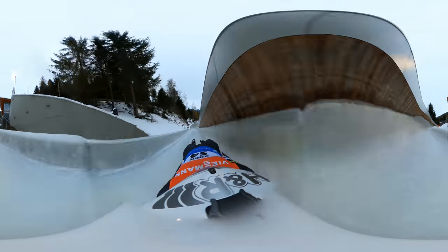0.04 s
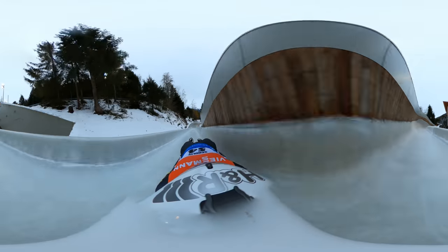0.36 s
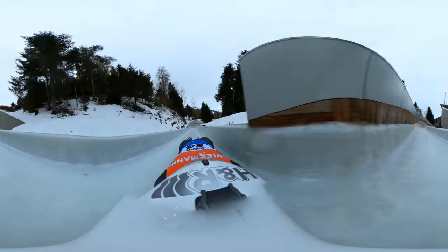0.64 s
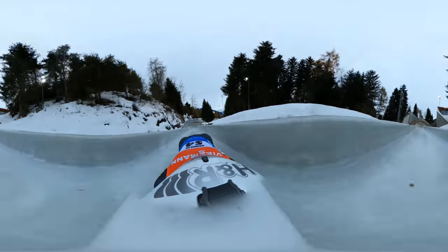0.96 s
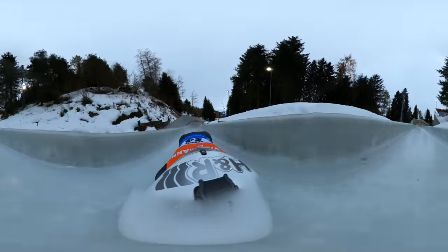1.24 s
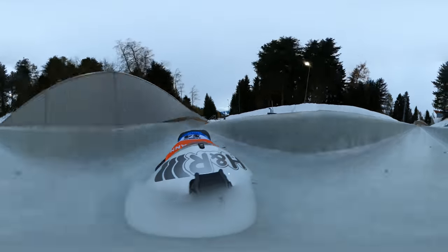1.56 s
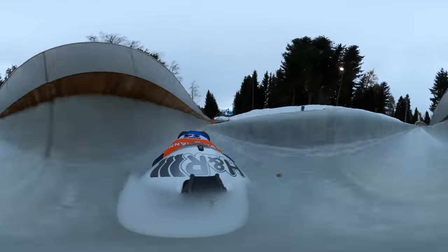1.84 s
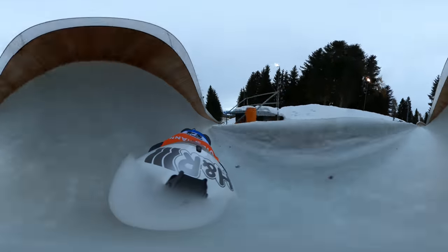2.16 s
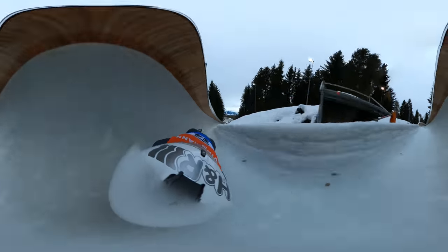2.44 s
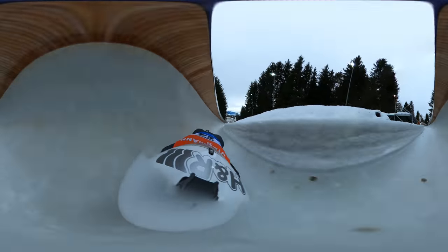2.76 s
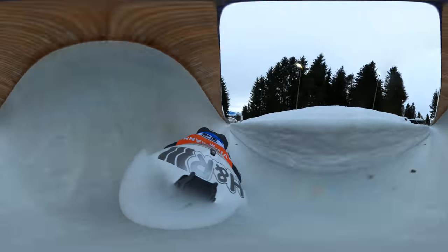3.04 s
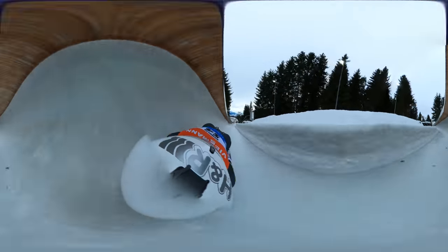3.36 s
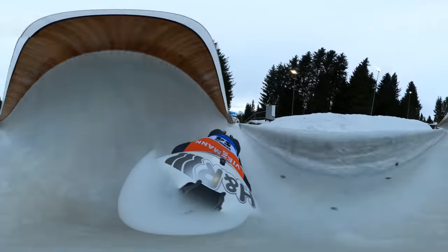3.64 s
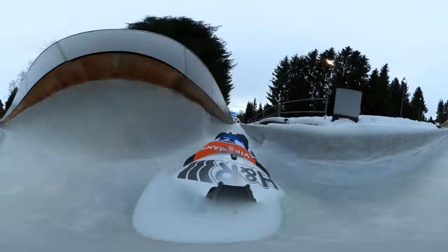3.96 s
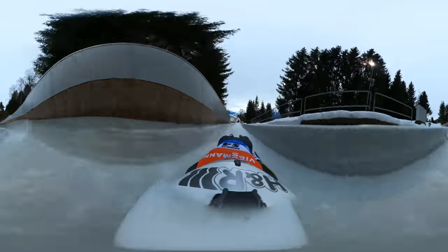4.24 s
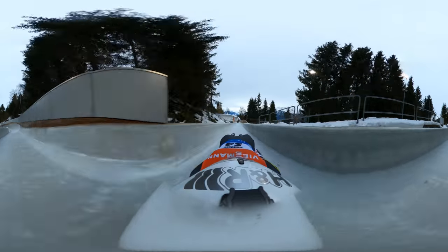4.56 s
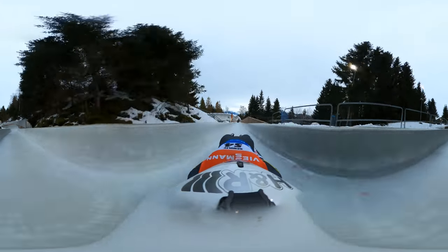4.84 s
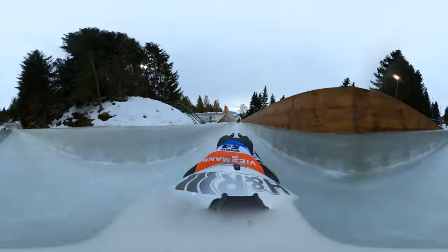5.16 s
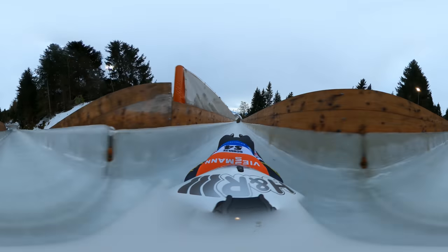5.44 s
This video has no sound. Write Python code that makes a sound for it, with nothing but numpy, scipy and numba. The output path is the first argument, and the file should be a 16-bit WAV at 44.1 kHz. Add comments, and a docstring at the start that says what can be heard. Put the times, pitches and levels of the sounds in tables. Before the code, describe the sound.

A sled speeds over bumpy ice with deep wind rush, hollow rumbling, rapid clattering knocks and hissing, chirping runners.

```python
"""Wind buffets the microphone over the rumble and hiss of a luge running down an ice track.
The camera rides on the sled, so bumps in the ice knock and rattle both the shell and the mount.
The steel runners throw up ice dust and flakes, climb in pitch under load and zip wherever an edge
bites. Now and then a splinter ticks against the camera, or the sled bottoms out with a heavy thud."""
import sys
import numpy as np
from scipy import signal
from scipy.fft import rfft, irfft
from scipy.io import wavfile
from scipy.ndimage import uniform_filter1d
from numba import njit

SR = 44100
rng = np.random.default_rng(int(sys.argv[2]) if len(sys.argv) > 2 else 0)


def transcribe(signal):
    """Save signal, clipped to [-1, 1], as a 16-bit WAV file at the path in sys.argv[1]."""
    frames = np.atleast_2d(signal).T
    limited = np.clip(frames, -1, 1)
    pcm = np.round(limited * 32767).astype(np.int16)
    wavfile.write(sys.argv[1], SR, pcm)


N = 246519
T = np.arange(N) / SR
TOP_HZ = 11500


def undb(db):
    """Decibels to gain."""
    return 10 ** (np.asarray(db) / 20)


def unit(x):
    """Scale to rms 1."""
    return x / np.sqrt(np.mean(x ** 2))


def fader(table, column=1):
    """Level automation: straight ramps between the timed points of one column."""
    points = np.transpose(table)
    return np.interp(T, points[0], points[column])


def walk(rate):
    """Smooth random drift with rms 1, heading for a new value `rate` times a second."""
    hold = int(SR / rate)
    steps = rng.standard_normal(N)[np.arange(N) // hold]
    return unit(uniform_filter1d(uniform_filter1d(steps, hold), hold))


def colour(x, spectrum, size=8192):
    """Minimum-phase EQ through (frequency [Hz], gain [dB]) points: nothing rings ahead of a hit."""
    hz, db = np.transpose(spectrum)
    bins = np.maximum(np.fft.rfftfreq(size, 1 / SR), 1)
    cepstrum = irfft(np.log(undb(np.interp(np.log(bins), np.log(hz), db))))
    cepstrum[1:size // 2] *= 2
    cepstrum[size // 2 + 1:] = 0
    return signal.fftconvolve(x, irfft(np.exp(rfft(cepstrum))))[:len(x)]


def ring(force, modes, detune):
    """Damped modes driven by a force; every contact point weights them differently."""
    t = np.arange(len(force)) / SR
    response = np.zeros(len(force))
    for hz, t60, db in modes:
        decay = undb(db + 2 * rng.standard_normal() - 60 * t / t60)
        response += decay * np.sin(2 * np.pi * hz * detune * t)
    return signal.fftconvolve(force, response)[:len(force)]


def grains(rate, spread_db, count=N):
    """Tiny contacts at random moments, a few much larger than the rest."""
    size = undb(spread_db * np.minimum(rng.exponential(size=count), 4))
    return unit((rng.random(count) < rate / SR) * size * rng.choice([-1, 1], count))


def slips(rate, half_s, spread_db):
    """Short surges at random moments, as steel catches and lets go; rms 1."""
    size = undb(spread_db * np.clip(rng.standard_normal(N), -2, 2))
    catches = (rng.random(N) < rate / SR) * size
    surge = signal.windows.gaussian(1025, half_s * SR)
    return unit(np.abs(signal.fftconvolve(catches, surge, "same")))


@njit
def resonate(x, hz, damping):
    """Swept state-variable filter; gives (band-pass, high-pass)."""
    band, high = np.empty(len(x)), np.empty(len(x))
    band_state, low_state = 0., 0.
    for i in range(len(x)):
        g = np.tan(np.pi * hz[i] / SR)
        v = (band_state + g * (x[i] - low_state)) / (1 + g * (g + damping))
        low = low_state + g * v
        band[i], high[i] = damping * v, x[i] - damping * v - low
        band_state, low_state = 2 * v - band_state, 2 * low - low_state
    return band, high


# fader moves of the airstream: (time [s], level [dB])
WIND_LEVELS = [(0.0, -17), (0.12, -24.5), (0.33, -17.5), (0.83, -25.5), (0.95, -20), (1.59, -18),
               (2.43, -23), (2.71, -18), (2.8, -23), (2.95, -22), (3.05, -21), (3.13, -31), (3.16, -24.5),
               (3.45, -21), (4.33, -19.5), (4.41, -22), (4.5, -18.5), (4.88, -22), (5.05, -18.5),
               (5.23, -17.5), (5.33, -16), (5.59, -18.5)]
# sub-heavy tone of the buffeting: (frequency [Hz], gain [dB])
WIND_EQ = [(12, -7), (28, 3), (45, 1), (70, -1), (100, -2.5), (130, -4.5), (180, -13.5), (260, -36),
           (500, -32.5), (1200, -88.5)]
def wind(gust_db=1.37, gusts_per_s=14, trim_db=1.5):
    """Eddies on the microphone port: a deep, tumbling pressure that comes in gusts."""
    eddies = unit(colour(rng.standard_normal(N), WIND_EQ))
    # the airstream is steady, so its strength over several eddies varies little
    strength = np.sqrt(uniform_filter1d(eddies ** 2, size=5000))
    return eddies / strength * undb(fader(WIND_LEVELS) + trim_db + gust_db * walk(gusts_per_s))


# fader moves of the sled on the ice: (time [s], shell rumble [dB], runner hiss [dB], ice spray [dB])
RIDE_LEVELS = [(0.0, -27.5, -44, -56.5), (0.721, -33.5, -47.5, -62.5), (1.231, -29, -47.5, -59),
               (1.52, -32.5, -48, -59.5), (2.02, -29.5, -49, -62.5), (2.44, -31, -47.5, -63),
               (2.74, -29, -54, -62), (3.111, -30, -48.5, -61), (3.3, -27.5, -46.5, -60),
               (3.61, -27, -47.5, -57), (4.47, -31, -45.5, -57), (5.151, -32, -39, -56.5),
               (5.59, -29.5, -44.5, -58)]
# hollow body of the rumble: (frequency [Hz], gain [dB])
RUMBLE_EQ = [(110, -20), (180, -1), (230, 4), (320, -1), (430, -9), (520, -14.5), (640, -13), (850, -24.5),
             (1050, -24.5), (1350, -33.5), (2200, -52), (4000, -82.5)]
def rumble(trim_db=-0.5):
    """The fine roughness of the ice drums on the sled."""
    roughness = grains(rate=600, spread_db=3.3) * undb(3 * walk(55))
    return unit(colour(roughness, RUMBLE_EQ)) * undb(fader(RIDE_LEVELS) + trim_db)


# what reaches the camera from the runners: (frequency [Hz], gain [dB])
SCRAPE_EQ = [(2800, 5), (4000, 0.5), (4900, -10), (5700, -3.5), (7200, -16.5), (8500, -25.5),
             (12000, -47.5)]
def scrape(force, pitch, damping=0.16):
    """Grit rings the steel-on-ice contact: little gets through below resonance, the top falls slowly."""
    _, resonant = resonate(force, pitch, damping)
    _, low_cut = resonate(resonant, 0.88 * pitch, 0.7)
    hiss, _ = resonate(low_cut, 1.5 * pitch, 0.59)
    return unit(colour(hiss, SCRAPE_EQ)) * np.std(force)


# modes of the steel, before detuning: (frequency [Hz], t60 [s], level [dB])
STEEL_MODES = [(5175, 0.046, -1), (5820, 0.05, 0), (6400, 0.03, 7)]
# midrange rasp of the sled's frame: (frequency [Hz], gain [dB])
FRAME_EQ = [(400, -18.5), (750, 0), (1050, -2), (1350, -8), (2000, -12), (5000, -46.5)]
def runners(hiss_db, trim_db=-2.5, frame_db=-5.5, grind_db=-12, steel_db=-19, sing_share=0.34):
    """Steel grinds on ice: the edges scrape, sing and zip, the blades ring faintly, the frame rasps."""
    contact_hz, bite_power, chatter = edge_bites()
    glide = undb(hiss_db + trim_db)
    grit = grains(rate=4000, spread_db=2.3) * unit(1 + 0.6 * slips(130, half_s=0.001, spread_db=3.5))
    force = grit * np.sqrt(glide ** 2 + (1 - sing_share) * bite_power * (1 + chatter ** 2) / 2)
    pitch = np.clip(contact_hz * np.exp(0.04 * walk(40) + 0.05 * walk(170)), 500, 8000)
    edge = scrape(force, pitch) + sing(pitch, sing_share * bite_power) + zips()
    steel = unit(ring(edge, STEEL_MODES, detune=0.99)) * np.std(edge) * undb(steel_db)
    # a lightly loaded runner skitters and makes the frame rasp; a pressed one holds it still
    skitter = glide * undb(frame_db) * np.sqrt(CONTACT_HZ / contact_hz)
    # a biting edge grinds through to the frame as well
    rasp = unit(colour(grit, FRAME_EQ)) * np.sqrt(skitter ** 2 + undb(grind_db) ** 2 * bite_power)
    return edge + steel + rasp


# puffs of ice dust: (time [s], level [dB], power fade [s])
DUST_PUFFS = [(1.7, -42.5, 0.0078), (3.585, -52.5, 0.036), (3.92, -52.5, 0.018), (4.155, -49, 0.034),
              (5.19, -52.5, 0.054)]
# airy tone of the dust: (frequency [Hz], gain [dB])
SPRAY_EQ = [(1500, -1.5), (3000, -2.5), (4000, -0.5), (5000, -1), (5600, -3), (7000, -5), (7900, -11.5),
            (8600, -19.5), (10000, -26), (12000, -46.5)]
def spray(spray_db, rise_s=0.0072):
    """Ice dust thrown up by the runners: a fine hiss that swells in puffs."""
    dust = grains(rate=9000, spread_db=2.5) * undb(walk(50))
    power = undb(spray_db) ** 2
    for s, db, fade_s in DUST_PUFFS:
        power += undb(db) ** 2 * np.exp(-np.abs(T - s) / np.where(T < s, rise_s, fade_s))
    return unit(colour(dust, SPRAY_EQ)) * np.sqrt(power)


# crisp tone of the ice flakes: (frequency [Hz], gain [dB])
FLAKE_EQ = [(800, -6), (2500, 4.5), (5000, 1.5), (7500, -0.5), (9000, -18), (12000, -29.5)]
def flakes(spray_db, trim_db=-7.5, bursts_per_s=16):
    """Flakes of ice break off and patter on the sled in short, bright bursts."""
    patter = grains(rate=3000, spread_db=2.5) * slips(bursts_per_s, half_s=0.0049, spread_db=-2.5)
    return unit(colour(patter, FLAKE_EQ)) * undb(spray_db + trim_db)


MOUNT_HZ = 236.5  # joint pitch of the mount's modes; a blow can shift it
# modes of the camera mount: (frequency [Hz], t60 [s], level [dB])
MOUNT_MODES = [(236, 0.072, 6), (268, 0.05, -4), (374, 0.064, -6.5)]
# modes of the shell, three for the clack, then the clatter: (frequency [Hz], t60 [s], level [dB])
SHELL_MODES = [(520, 0.031, 10.5), (595, 0.025, 3.5), (717, 0.017, 8.5), (927, 0.019, -3),
               (995, 0.029, 0.5), (1251, 0.01, 9.5), (1684, 0.033, -1), (1927, 0.055, -2)]
# what the padded mount lets through: (frequency [Hz], gain [dB])
PAD_EQ = [(90, -6.5), (190, 0.5), (700, 0.5), (1500, -9.5), (2500, -10.5), (4000, -2.5), (8000, -43.5)]
def knock(thump_db, clack_db, clatter_db, crack_db, rattle_s, mount_hz, body_db=-0.27, top_db=3.5):
    """One bump: a blow inside a short rattle rings mount and shell, with a crack of steel on ice."""
    t = np.arange(8192) / SR - 0.02
    envelope = np.exp(-np.abs(t) / np.where(t < 0, 0.4 * rattle_s, rattle_s))
    rattle = grains(rate=2500, spread_db=3.5, count=len(t)) * envelope
    blow = signal.unit_impulse(len(t), np.argmax(t >= 0))
    detune = np.exp(0.045 * rng.standard_normal())
    thump = colour(ring(blow + 0.083 * rattle, MOUNT_MODES, mount_hz / MOUNT_HZ), PAD_EQ)
    clack = colour(ring(blow + 0.16 * rattle, SHELL_MODES[:3], detune), PAD_EQ)
    clatter = colour(ring(blow + 0.16 * rattle, SHELL_MODES[3:], detune), PAD_EQ)
    layers = [(thump, thump_db + body_db), (clack, clack_db + body_db),
              (clatter, clatter_db + top_db), (crack(blow, rattle), crack_db + top_db)]
    # each level is an rms, as if the layer's energy fell within 17 ms
    return sum(x * undb(db) / np.sqrt(np.sum(x ** 2) / (0.017 * SR)) for x, db in layers)


# hard, bright tone of steel hitting ice: (frequency [Hz], gain [dB])
CRACK_EQ = [(600, -46), (1500, 12.5), (2500, 12.5), (3600, 11), (5000, -1.5), (7000, -11), (8200, -23.5),
            (9500, -29), (13000, -47)]
def crack(blow, rattle):
    """The runner strikes the ice: the dry attack on top of a knock."""
    return colour(blow + 0.13 * rattle, CRACK_EQ)


# mix of a small bump against the rumble fader: (thump [dB], clack [dB], clatter [dB], crack [dB])
JOLT_MIX = [1.5, -11.5, -19, -23.5]
def jolts(per_s=7, spread_db=1, rattle_s=0.0079, count=80):
    """Cues for small bumps at uneven intervals, stronger where the ice is rough; rows as in BIG_BUMPS."""
    chance = rng.standard_normal((count, 5))
    times = (np.arange(count) + 0.5 + 0.3 * chance[:, 0]) / per_s
    rumble_db = np.interp(times, T, fader(RIDE_LEVELS))
    levels = rumble_db[:, None] + JOLT_MIX + spread_db * chance[:, 1:]
    return [(s, *mix, rattle_s, MOUNT_HZ) for s, mix in zip(times, levels) if s < T[-1]]


# the big bumps in the ice: (time [s], mount thump [dB], shell clack [dB], shell clatter [dB],
# steel crack [dB], rattle decay [s], mount pitch [Hz])
BIG_BUMPS = [(0.09, -14.5, -30, -42, -46, 0.0099, 223), (0.109, -10, -26, -33.5, -42, 0.0055, 234),
             (0.161, -19.5, -51, -55, -53, 0.0041, 234), (0.234, -20.5, -32, -46, -53, 0.0036, 260),
             (0.354, -15.5, -39.5, -42, -60, 0.0018, 224), (0.37, -25, -51, -46, -63, 0.032, 208),
             (0.437, -18, -49, -40.5, -48.5, 0.01, 244), (0.447, -21.5, -51, -52, -62, 0.002, 252),
             (0.518, -22, -48, -44, -53, 0.01, 211), (0.59, -25, -41, -44, -50, 0.0044, 205),
             (0.701, -21, -49, -44.5, -48, 0.018, 218), (0.847, -24.5, -41.5, -41, -47.5, 0.021, 213),
             (1.026, -13, -26.5, -39, -41, 0.0092, 235), (1.536, -17.5, -29, -37.5, -48, 0.026, 242),
             (1.565, -22, -22.5, -36.5, -45, 0.0099, 225), (1.669, -20.5, -22.5, -31.5, -40, 0.0076, 247),
             (1.708, -19.5, -28, -30.5, -43, 0.012, 210), (1.798, -20.5, -28, -36, -70, 0.016, 237),
             (1.812, -46, -39, -34.5, -57, 0.023, 275), (1.837, -39, -28, -40.0, -42.5, 0.011, 230),
             (1.875, -23, -32.5, -37, -51, 0.002, 240), (1.888, -23.5, -27, -37.5, -52, 0.0017, 253),
             (1.986, -21.5, -39, -44.5, -46, 0.0051, 200), (2.04, -22, -41, -52, -62, 0.0017, 191),
             (2.096, -19.5, -32.5, -40.5, -51, 0.013, 231), (2.117, -28, -42.5, -42, -52, 0.0054, 243),
             (2.203, -26, -30.5, -49, -55, 0.0055, 244), (2.245, -20.5, -28.5, -49, -53, 0.0022, 309),
             (2.48, -20.5, -44, -54, -63, 0.011, 222), (2.505, -31, -33.5, -60, -70, 0.013, 252),
             (2.579, -32, -34, -49, -55, 0.0054, 196), (2.677, -25, -30.5, -43, -51, 0.014, 193),
             (2.698, -20.5, -41, -55, -56, 0.0059, 194), (2.819, -24, -32.5, -40, -47, 0.023, 260),
             (2.838, -20.5, -29.5, -49, -54, 0.014, 249), (2.915, -21.5, -38, -50, -60, 0.024, 234),
             (2.965, -29.5, -37, -55, -63, 0.0073, 250), (3.01, -27, -37, -48, -55, 0.0041, 254),
             (3.056, -18.5, -28, -43, -56, 0.0087, 214), (3.11, -30, -44, -50, -64, 0.0046, 246),
             (3.156, -22, -34, -36, -51, 0.0025, 235), (3.194, -24.5, -34, -37, -55, 0.0033, 261),
             (3.24, -20, -31, -57, -62, 0.0086, 198), (3.276, -26.5, -28.5, -49, -57, 0.0044, 260),
             (3.357, -19.5, -42, -35.5, -53, 0.0019, 266), (3.416, -22.5, -44, -44, -54, 0.016, 269),
             (3.536, -23.5, -31.5, -49, -50.5, 0.014, 285), (3.574, -19.5, -39, -44, -46.5, 0.0026, 265),
             (3.68, -23.5, -48, -58, -58, 0.0078, 220), (3.72, -19.5, -32.5, -48, -51, 0.0054, 257),
             (3.789, -19.5, -30, -56, -57, 0.0025, 260), (3.853, -25.5, -33.5, -47.5, -60, 0.0049, 268),
             (3.868, -27, -47, -58.5, -58, 0.0033, 260), (3.932, -18, -31, -39.5, -45, 0.012, 288),
             (4.006, -18.5, -35, -41, -51, 0.0052, 263), (4.06, -32, -31.5, -47, -48.5, 0.0065, 272),
             (4.114, -30, -31, -38, -57, 0.033, 209), (4.15, -22, -33, -49, -44.5, 0.003, 235),
             (4.249, -21, -35.5, -40.5, -46.5, 0.0093, 225), (4.308, -20.5, -34, -39, -44.5, 0.016, 228),
             (4.323, -27, -30.5, -41, -53, 0.0018, 231), (4.334, -26.5, -24, -38, -41.5, 0.0036, 278),
             (4.346, -35, -32, -39, -48, 0.0049, 260), (4.447, -29, -39, -46, -47.5, 0.0086, 224),
             (4.614, -34, -36, -51, -51.5, 0.0027, 248), (4.682, -26.5, -36, -42, -47, 0.0022, 251),
             (4.688, -17, -32, -43, -40, 0.0072, 253), (4.737, -19.5, -30.5, -33.5, -42, 0.013, 205),
             (4.81, -18.5, -26.5, -31, -35, 0.0033, 201), (4.828, -27, -37, -42, -44.5, 0.015, 206),
             (4.96, -43, -33.5, -52, -48, 0.0037, 195), (5.014, -21, -34, -39.5, -43.5, 0.0084, 267),
             (5.102, -16, -28, -38.5, -39.5, 0.0058, 216), (5.141, -29, -32.5, -41, -47.5, 0.0048, 240),
             (5.248, -21.5, -42, -48, -46.5, 0.0023, 216), (5.334, -17.5, -51, -41, -48, 0.0048, 208),
             (5.502, -23, -27, -34, -43, 0.0056, 192)]
def bumps(preroll_s=0.0185):
    """Every bump along the track, big or small, knocks the sled once."""
    out = np.zeros(N + SR)
    for s, *blow in BIG_BUMPS + jolts():
        hit = knock(*blow)
        start = max(int((s - preroll_s) * SR), 0)
        out[start:start + len(hit)] += hit
    return out[:N]


CONTACT_HZ = 1630  # resonance of an unloaded runner on the ice
# an edge loads up, sings, then lets go: (release time [s], top pitch [Hz], level [dB], build-up [s])
EDGE_BITES = [(0.398, 1590, -35.5, 0.023), (0.95, 1560, -42, 0.03), (0.985, 1747, -38, 0.02),
              (1.19, 1630, -40.5, 0.012), (1.236, 1950, -40.5, 0.016), (1.325, 1670, -41.5, 0.019),
              (1.373, 2095, -40.5, 0.017), (1.415, 1910, -46, 0.018), (1.464, 2476, -37.5, 0.03),
              (1.487, 2590, -40.5, 0.02), (1.598, 2330, -47, 0.025), (1.645, 1960, -43.5, 0.019),
              (1.668, 2770, -43, 0.0085), (1.701, 3940, -37.5, 0.017), (1.722, 3550, -46, 0.01),
              (1.86, 2410, -48, 0.025), (1.898, 2480, -47.5, 0.042), (1.948, 2940, -46.5, 0.025),
              (1.986, 3000, -49, 0.011), (2.088, 2460, -47.5, 0.025), (2.145, 2520, -54.5, 0.014),
              (2.347, 2480, -51.5, 0.042), (2.485, 2270, -52, 0.02), (2.675, 2525, -44, 0.024),
              (2.714, 2316, -49, .014), (2.778, 2510, -47.5, 0.023), (2.902, 2180, -44, 0.022),
              (2.949, 2390, -50, 0.019), (3.043, 2650, -49.5, .045), (3.545, 1754, -43.5, .04),
              (3.605, 2436, -42.5, 0.027), (3.789, 1980, -42.5, 0.04), (3.971, 2260, -47, 0.045),
              (4.151, 2860, -40.5, 0.025), (4.208, 2630, -51.5, .03), (4.495, 1970, -46, 0.038),
              (4.551, 2184, -41.5, 0.012), (5.196, 2450, -45.5, 0.013), (5.3, 1886, -43, 0.018)]
def edge_bites(release_s=0.0096, slip_rise=0.032, curve_s=2.6, curve_half_s=0.45, curve_lift_hz=230):
    """Each bite raises the contact's pitch and power as the load builds; the edge sticks and slips."""
    # the long banked curve presses the runners down and lifts their resonance
    rest_hz = CONTACT_HZ + curve_lift_hz * np.exp(-((T - curve_s) / curve_half_s) ** 2)
    pitch, power, catch = rest_hz, np.zeros(N), np.zeros(N)
    chatter = slips(rate=76, half_s=0.0021, spread_db=0.5)
    for s, top_hz, db, build_s in EDGE_BITES:
        load = np.exp(-((T - s) / np.where(T < s, build_s, release_s)) ** 2)
        pitch = np.maximum(pitch, rest_hz + (top_hz - rest_hz) * load ** 0.73)
        power += undb(db) ** 2 * load
        # whenever the edge catches, the contact stiffens for a moment
        catch += slip_rise * load * (np.minimum(chatter, 2) - 1)
    return pitch * np.exp(catch), power, chatter


def sing(pitch, power, damping=0.13):
    """Under load the contact resonance sings: a narrow band of noise that follows its pitch."""
    band, _ = resonate(rng.standard_normal(N), pitch, damping)
    tone, _ = resonate(band, pitch, damping)
    return tone * np.sqrt(power / uniform_filter1d(tone ** 2, size=600))


# an edge snaps over a ridge in the ice: (time [s], starting pitch [Hz], peak level [dB])
RIDGE_ZIPS = [(0.388, 1730, -33.5), (0.394, 1944, -30.5), (0.5297, 1916, -35.5), (0.955, 1764, -28),
              (0.984, 1857, -29.5), (1.183, 1600, -29), (1.195, 1887, -34.5), (1.235, 1990, -35),
              (1.322, 1870, -40.5), (1.369, 2220, -29.5), (1.374, 2475, -25.5), (1.404, 2110, -31.5),
              (1.428, 2307, -24.5), (1.463, 2475, -31), (1.486, 2430, -28.5), (1.598, 2290, -36),
              (1.688, 3500, -29), (1.698, 4030, -28), (1.701, 4710, -26.5), (1.722, 3860, -36.5),
              (1.926, 2970, -31), (1.985, 3050, -29.5), (1.99, 3270, -39.5), (2.088, 2775, -33.5),
              (2.199, 1980, -32), (2.33, 2220, -33), (2.451, 2263, -30), (2.481, 2446, -30.5),
              (2.656, 2440, -36.5), (2.675, 3120, -33.5), (2.726, 2200, -34.5), (2.747, 2430, -36),
              (2.771, 2430, -37), (2.824, 3490, -42.5), (2.892, 2210, -36), (2.948, 2630, -38),
              (3.012, 2335, -34.5), (3.029, 2910, -39), (3.049, 2880, -37.5), (3.533, 1880, -30.5),
              (3.583, 1990, -37.5), (3.593, 2330, -27.5), (3.685, 2016, -30), (3.7828, 2060, -36),
              (3.972, 2360, -33.5), (4.097, 1773, -32.5), (4.152, 3236, -26), (4.2161, 2560, -28),
              (4.294, 1670, -32), (4.496, 2310, -30.5), (4.548, 2626, -28.5), (5.182, 1900, -35.5),
              (5.196, 2665, -24.5), (5.294, 2016, -33)]
# what the sled passes on of a zip: (frequency [Hz], gain [dB])
ZIP_EQ = [(6000, 0.5), (7500, -10), (9500, -30)]
def zips(rise_s=0.0011, fade_s=0.00074, doubling_s=0.0017, roughness=0.17, count=1024):
    """Each ridge stiffens the contact for an instant: a sharp, gritty chirp that shoots upward."""
    out = np.zeros(N + count)
    t = (np.arange(count) - count // 4) / SR
    climb = 1 + np.logaddexp(0, 4 * t / doubling_s) / 4  # flat, then bending into a straight rise
    envelope = np.exp(np.where(t < 0, -(t / rise_s) ** 2, -t / fade_s))
    for s, hz, db in RIDGE_ZIPS:
        grit = unit(uniform_filter1d(rng.standard_normal(count), size=12))
        phase = 2 * np.pi * (np.cumsum(np.minimum(hz * climb, TOP_HZ)) / SR + rng.random())
        start = int(s * SR) - count // 4
        out[start:start + count] += undb(db) * envelope * (1 + roughness * grit) * np.sin(phase)
    return colour(out[:N], ZIP_EQ)


# hits of ice splinters: (time [s], level [dB])
SPLINTER_HITS = [(1.671, -59), (1.6995, -56), (4.34, -54), (4.449, -50.5), (4.69, -51), (4.735, -60),
                 (5.334, -61)]
# their glassy tone: (frequency [Hz], gain [dB])
SPLINTER_EQ = [(2500, -24), (7000, 4), (10500, -6), (13000, -13)]
def splinters(fade_s=0.0016):
    """Single splinters of ice strike the camera: tiny, very bright ticks."""
    envelope = sum(undb(db) * np.exp(-np.abs(T - s) / fade_s) for s, db in SPLINTER_HITS)
    return unit(colour(rng.standard_normal(N), SPLINTER_EQ)) * envelope


# dips in the track: (time [s], level [dB])
DIP_THUDS = [(1.693, -21.5), (2.037, -16.5), (2.672, -14), (2.85, -24), (3.915, -22), (4.33, -17)]
# low modes of the whole sled, before detuning: (frequency [Hz], t60 [s], level [dB])
SLED_MODES = [(93, 0.17, 7.5), (122, 0.11, 4.5), (167.5, 0.074, -1.5)]
def thuds(push_s=0.00069, rms_window_s=0.064):
    """The sled bottoms out in a dip: a soft, heavy push shakes all of it."""
    out = np.zeros(N)
    for s, db in DIP_THUDS:
        push = np.exp(-0.5 * ((T - s) / push_s) ** 2)
        shake = ring(push, SLED_MODES, detune=0.93)
        out += shake * undb(db) / np.sqrt(np.sum(shake ** 2) / (rms_window_s * SR))
    return out


def scene():
    """Wind, sled and ice in mono at the camera: a continuous bed with hits on top."""
    hiss_db, spray_db = fader(RIDE_LEVELS, column=2), fader(RIDE_LEVELS, column=3)
    bed = wind() + rumble() + runners(hiss_db) + spray(spray_db) + flakes(spray_db)
    return (bed + thuds() + splinters() + bumps())[None]


def record(dry, drive=0.99):
    """The camera rounds the loudest peaks and cuts the top."""
    rounded = np.tanh(drive * dry) / drive
    high_cut = signal.ellip(8, 0.2, 70, TOP_HZ, fs=SR, output="sos")
    return signal.sosfilt(high_cut, rounded)


dry = scene()
out = record(dry)
transcribe(out)
```